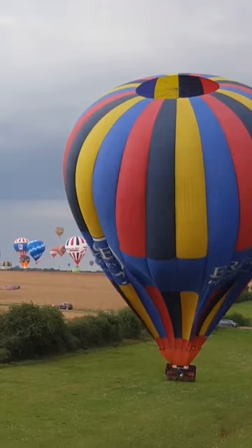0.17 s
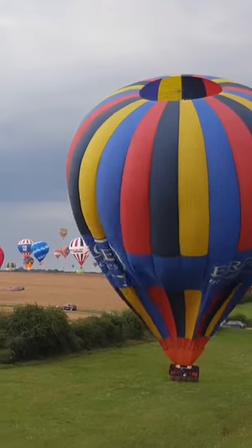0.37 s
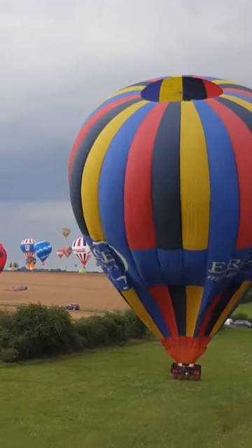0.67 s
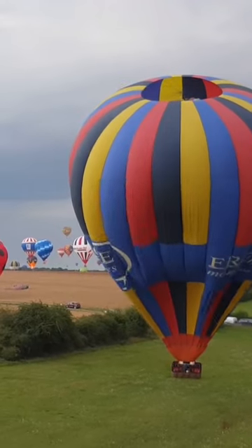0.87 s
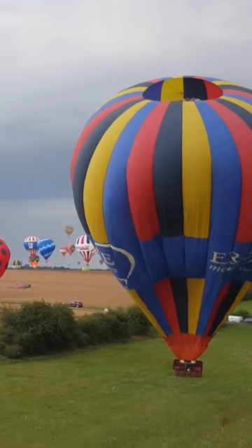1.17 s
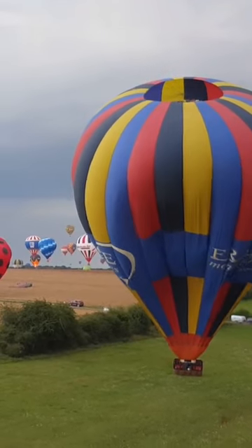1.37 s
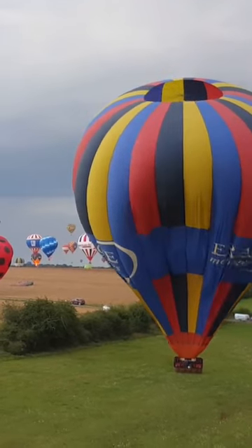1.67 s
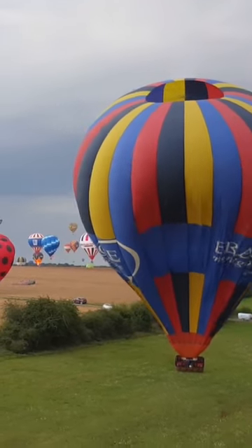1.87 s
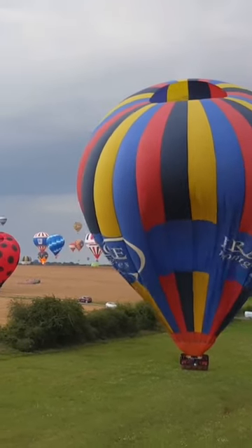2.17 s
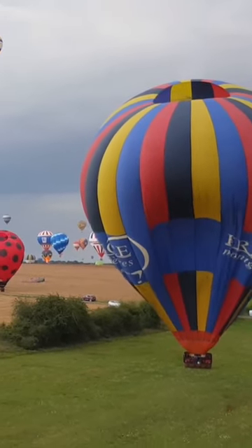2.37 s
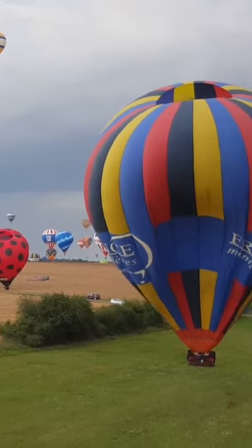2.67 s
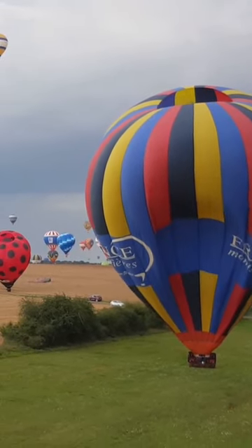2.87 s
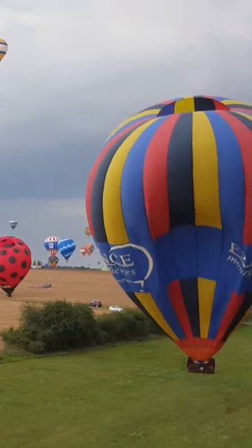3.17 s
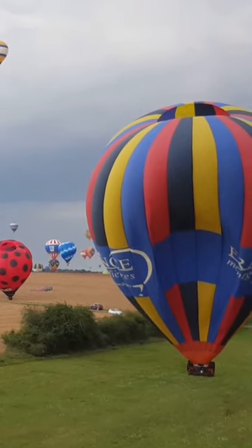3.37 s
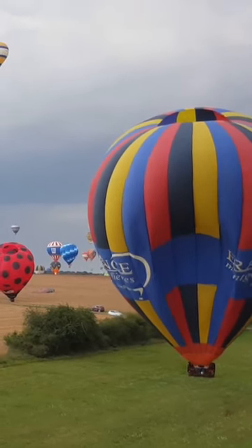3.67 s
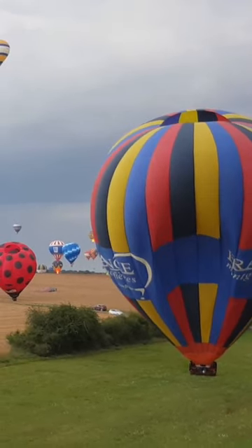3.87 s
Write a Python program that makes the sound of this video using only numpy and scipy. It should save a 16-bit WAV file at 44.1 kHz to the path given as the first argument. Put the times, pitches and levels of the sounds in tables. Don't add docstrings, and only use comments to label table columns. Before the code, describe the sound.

A gas burner roars loudly close overhead in a balloon basket outdoors, a dense, fluttering rumble with tearing, hissing gas from 0 to about 2.4 seconds. The hiss then sinks and the flame dies quickly, out by about 2.9. A near-quiet low rumble remains; from about 3.2 a distant burner swells softly, dull and low, peaking near 3.6 and easing towards 4 seconds. Stereo, close microphone.

```python
import sys
import numpy as np
from scipy import signal
from scipy.fft import rfft, irfft, next_fast_len
from scipy.io import wavfile
from scipy.ndimage import uniform_filter1d, map_coordinates

SR = 44100
rng = np.random.default_rng(int(sys.argv[2]) if len(sys.argv) > 2 else 0)


def volts_from_db(level):
    exponent = np.asarray(level, float) / 20
    return 10 ** exponent


def log_audio(samples):
    frames = np.atleast_2d(samples).T
    limited = np.clip(frames, -1, 1)
    pcm = np.round(limited * 32767).astype(np.int16)
    wavfile.write(sys.argv[1], SR, pcm)


N = 176400


def unit(x):
    return x / np.sqrt(np.mean(x ** 2) + 1e-20)


def along(points, hz):
    point_hz, value = np.transpose(points)
    return np.interp(np.log(hz + 1), np.log(point_hz + 1), value)


def curves(rows):
    time_s, *columns = np.transpose(rows)
    return [np.interp(np.arange(N) / SR, time_s, column) for column in columns]


def wobble(rate_hz):
    return map_coordinates(rng.standard_normal(400), [np.arange(N) * rate_hz / SR])


def filtered(x, response):
    size = next_fast_len(N + SR // 2)
    hz = np.fft.rfftfreq(size, 1 / SR)
    return irfft(rfft(x, size) * response(hz), size)[..., :N]


def rush(spectrum, apart, patchy_db):
    z = signal.stft(rng.standard_normal((2, N)), nperseg=512)[2]
    patches = rng.standard_normal(z.shape[1:])
    patches = uniform_filter1d(patches, size=7, axis=0)
    patches = uniform_filter1d(patches, size=7, axis=1)
    pair = signal.istft(z * volts_from_db(patchy_db * unit(patches)), nperseg=512)[1][:, :N]

    def colour_and_split(hz):
        angle = np.arctan(volts_from_db(along(apart, hz)))
        return volts_from_db(along(spectrum, hz)) * [np.cos(angle), np.sin(angle)]

    mid, side = filtered(pair, colour_and_split)
    return unit(np.array([mid + side, mid - side]))


def ports(x, body, lead):
    def response(hz):
        gain_db = 0
        for centre_hz, width_hz, left_db, right_db in body:
            hump = np.exp(-((hz - centre_hz) / width_hz) ** 2)
            gain_db = gain_db + np.outer([left_db, right_db], hump)
        return volts_from_db(gain_db) * np.exp(np.outer([.5j, -.5j], lead(hz)))
    return filtered(x, response)


def near_burner():
    # (time [s], gas flow at the jets [dB], flame size [dB])
    valve = [(0, -32, -12), (.5, -32.5, -12.5), (1.1, -32, -11), (1.35, -31.5, -14.5), (1.85, -34, -13.5),
             (2.04, -32, -12), (2.22, -34.5, -11), (2.42, -35.5, -13.5), (2.46, -37.5, -13.5),
             (2.52, -36, -14), (2.56, -41.5, -16), (2.66, -42.5, -16.5), (2.76, -51, -21.5),
             (2.82, -56.5, -25.5), (2.87, -73, -30.5), (2.95, -73, -44)]
    # (frequency [Hz], density [dB per Hz])
    rumble_colour = [(22, -39), (45, -13), (75, -6), (150, -0.5), (300, -2.5), (520, -6), (780, -17),
                     (1000, -64)]
    throat_colour = [(600, -42), (780, -7), (1050, 2), (1450, -5), (1750, -11), (2300, -34)]
    tear_colour = [(1000, -34), (1600, -2.5), (2600, 3.5), (3900, -5.5), (4600, -14), (7000, -35)]
    hiss_colour = [(1500, -34), (3500, -2), (5000, 1), (8000, 0), (10500, -3), (13000, -0.5), (15400, -1.5)]
    # (frequency [Hz], ratio [dB])
    near_apart = [(150, -46), (1000, -20), (1900, -4), (2250, -5), (2800, -3.5), (3900, -6), (4200, 0.5),
                  (9000, 0.6)]
    # (centre [Hz], width [Hz], left gain [dB], right gain [dB])
    near_body = [(560, 155, -0.9, 2.3), (740, 67, -3.5, -1.5), (1060, 180, -2, -0.5), (1277, 87, -12, 0.5),
                 (1420, 130, 2.5, 2), (1790, 45, -6, -3), (1945, 170, 7, 2), (2200, 55, 1, -4),
                 (2700, 66, -5, -3), (2790, 67, 2, -0.5), (3100, 120, -3, -4), (3470, 730, -1, 4.5),
                 (8450, 340, 3, -5.5), (10800, 260, 3.5, -7)]
    # (frequency [Hz], lead [rad])
    near_lead = [(200, 0.016), (500, 0.33), (1030, 0.54), (1720, 2.1), (2070, 3.03), (2410, 0.55),
                 (2760, 2.44), (3900, 3.6)]
    snuff_s, fade_s = 2.86, 0.072
    throat_db, throat_from_gas = -10, .3
    tear_db, tear_from_gas = -15, 0.63

    gas_db, flame_db = curves(valve)

    def both_db(gas_share):
        gas_change_db = gas_db - gas_db[0]
        flame_change_db = flame_db - flame_db[0]
        return flame_db[0] + gas_share * gas_change_db + (1 - gas_share) * flame_change_db

    flicker = .25 * wobble(15) + .9 * wobble(34) + .4 * wobble(55)
    rumble_db = flame_db + .3 * flicker
    rumble = volts_from_db(rumble_db) * rush(rumble_colour, near_apart, patchy_db=.4)
    throat_level_db = throat_db + both_db(throat_from_gas) + 0.33 * flicker
    throat = volts_from_db(throat_level_db) * rush(throat_colour, near_apart, patchy_db=.8)
    tear_level_db = tear_db + both_db(tear_from_gas) + 0.91 * flicker + 0.4 * wobble(26.1)
    tear = volts_from_db(tear_level_db) * rush(tear_colour, near_apart, patchy_db=1.0)
    hiss_db = gas_db + 4.0 + 0.74 * flicker + 0.36 * wobble(29.9)
    hiss = volts_from_db(hiss_db) * rush(hiss_colour, near_apart, patchy_db=1.15)

    lit = np.clip((snuff_s + fade_s - np.arange(N) / SR) / fade_s, 0, 1)
    lead_hz, lead_rad = np.transpose([(0, 0)] + near_lead)
    roar = lit * (rumble + throat + tear + hiss)
    return ports(roar, near_body, lambda hz: np.interp(hz, lead_hz, lead_rad))


def far_burner():
    # (time [s], gas flow [dB], flame size [dB])
    far_valve = [
        (2.9, -53, -37.5),
        (3.1, -53, -36),
        (3.25, -47.5, -32.5),
        (3.37, -45, -29),
        (3.42, -42, -29),
        (3.62, -42.5, -26.5),
        (3.8, -45, -26.5),
        (3.9, -44, -34.5),
        (4.0, -49.5, -27.5),
    ]
    # (frequency [Hz], density [dB per Hz])
    far_rumble_colour = [(22, -23), (60, -11), (120, -4), (190, -0.5), (350, -8), (600, -17), (1000, -31),
                         (1500, -50)]
    far_hiss_colour = [(400, -17), (800, 0), (1500, -7.5), (3000, -9.5), (4500, -16), (8000, -19.5),
                       (10000, -25.5), (15000, -23)]
    # (frequency [Hz], ratio [dB])
    far_apart = [(200, -34), (450, -17), (650, -2.5), (4000, -6), (7500, -6), (9000, -1.5), (10500, 1)]
    # (centre [Hz], width [Hz], left gain [dB], right gain [dB])
    far_body = [(450, 280, 1.5, 3.5), (1200, 300, -1, 2), (2216, 170, 1, 10), (2600, 150, -7, -1.5),
                (3300, 1130, -6.5, 2.5), (3500, 180, 6, 4), (4450, 150, 4, 5.5), (5400, 200, 0, 2),
                (8600, 350, 8, 0), (10500, 2700, 0.5, -13), (14000, 1200, -4, -4)]
    left_lead_s = 0.000543

    gas_db, flame_db = curves(far_valve)
    puffs = .5 * wobble(18) + .6 * wobble(32)
    rumble = volts_from_db(flame_db + .7 * puffs) * rush(far_rumble_colour, far_apart, patchy_db=.5)
    hiss = volts_from_db(gas_db + 4.5 + .9 * puffs) * rush(far_hiss_colour, far_apart, patchy_db=.7)
    return ports(rumble + hiss, far_body, lambda hz: 2 * np.pi * hz * left_lead_s)


def scene():
    return near_burner() + far_burner()


def treble_gaps(x):
    # (low edge [Hz], high edge [Hz], share of frames [0-1])
    dropouts = [(10350, 10950, .17), (9700, 10300, .04), (15050, 15600, .4)]
    quiet_from_hz, quiet_db, under_db, scatter_db = 8200, -73, 4, 1.8
    bins = 14

    hz, frame_s, z = signal.stft(x, SR, nperseg=1024)
    band = np.arange(len(hz)) // bins
    power = uniform_filter1d(np.abs(z) ** 2, size=3, axis=2)
    band_power = np.add.reduceat(power, np.arange(0, len(hz), bins), axis=1) / bins
    level_db = 10 * np.log10(band_power + 1e-20)
    luck = unit(uniform_filter1d(rng.standard_normal(level_db.shape), size=6, axis=2))

    treble_db = np.median(level_db[:, 15:25], axis=1).max(axis=0)
    treble_db = uniform_filter1d(treble_db, size=9)
    heard = (level_db + scatter_db * luck > treble_db - under_db) | (treble_db > quiet_db)
    keep = heard[:, band] | (hz < quiet_from_hz)[:, None]

    for low_hz, high_hz, share in dropouts:
        chance = rng.standard_normal((2, 1, len(frame_s))).cumsum(0)
        chance = uniform_filter1d(chance, size=3)
        keep[:, (hz > low_hz) & (hz < high_hz)] &= chance > np.quantile(chance, share)
    return signal.istft(z * keep, SR, nperseg=1024)[1][:, :N]


def band_limit(x):
    return signal.sosfilt(signal.butter(12, 15490, fs=SR, output="sos"), x)


def record(dry):
    ceiling = .92
    rounded = dry / (1 + np.abs(dry / ceiling) ** 8) ** (1 / 8)
    mix = treble_gaps(rounded)
    return band_limit(mix)


dry = scene()
out = record(dry)
log_audio(out)
```